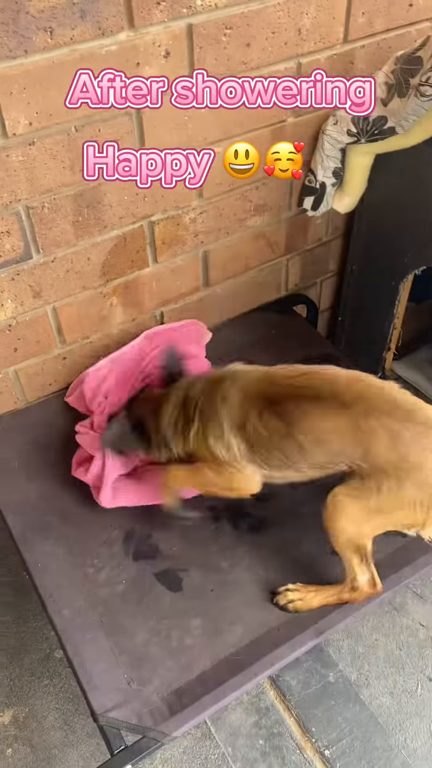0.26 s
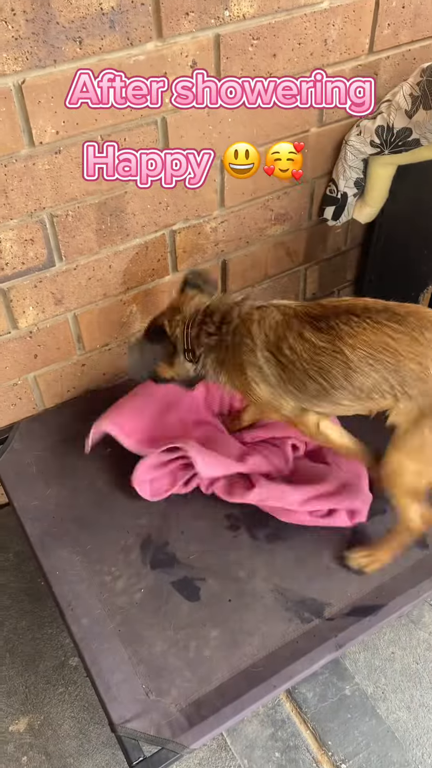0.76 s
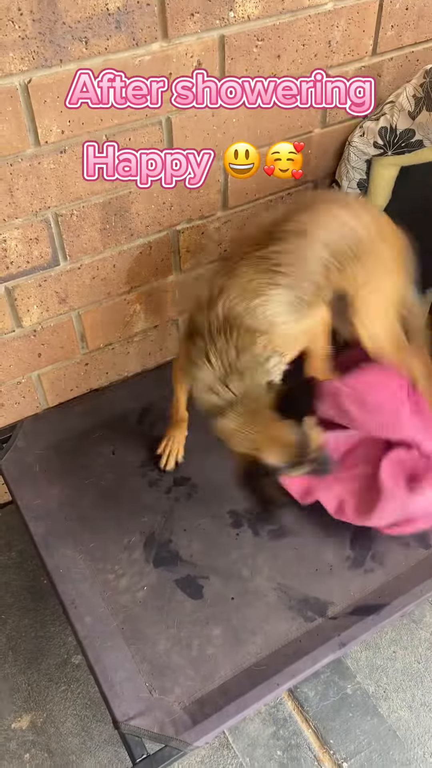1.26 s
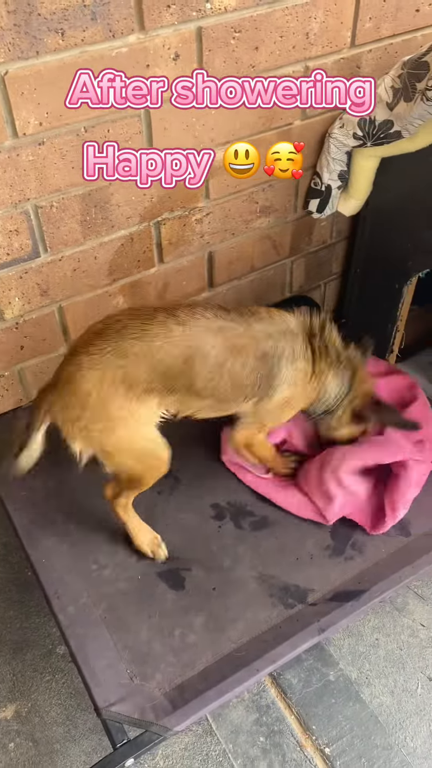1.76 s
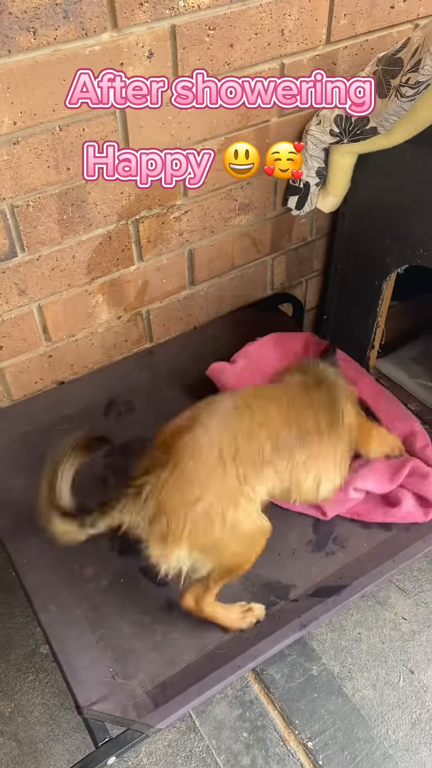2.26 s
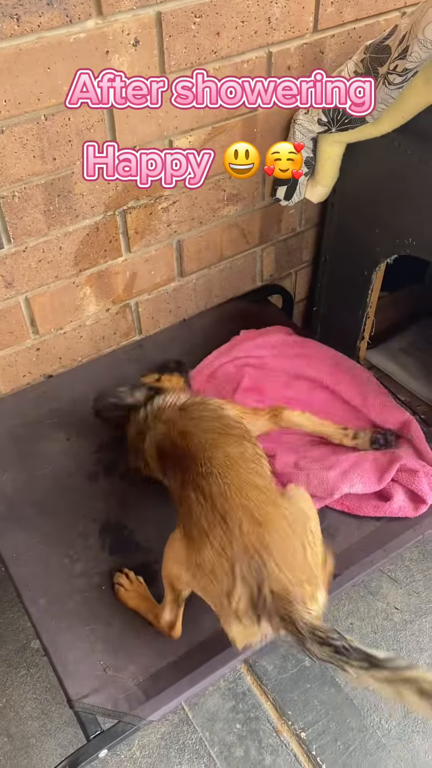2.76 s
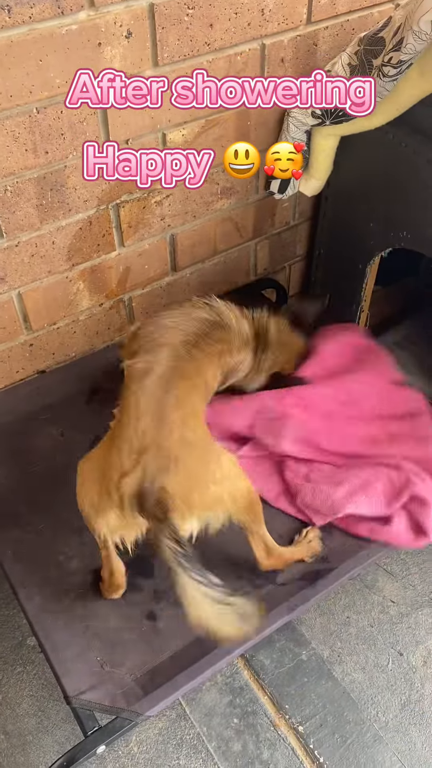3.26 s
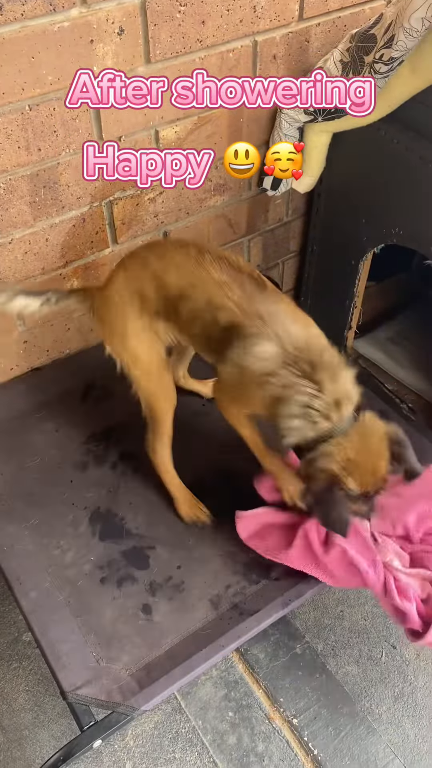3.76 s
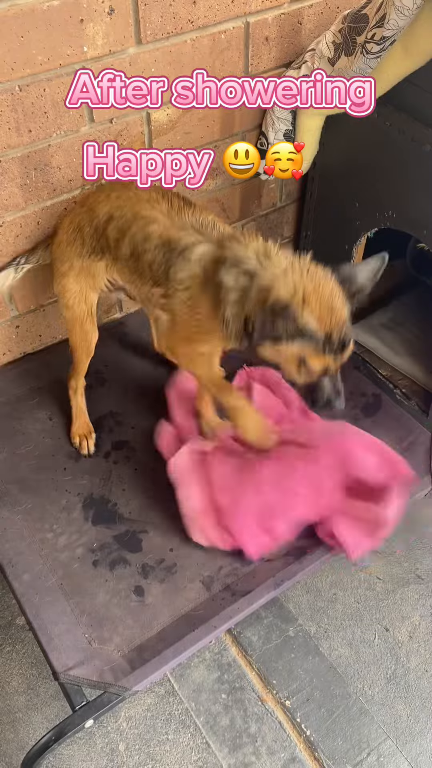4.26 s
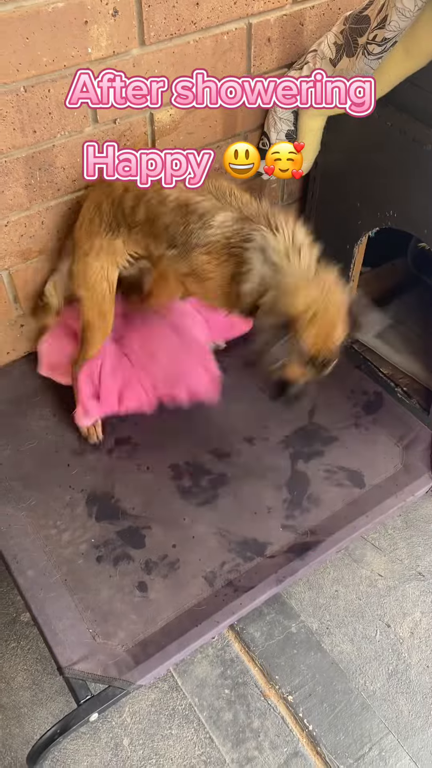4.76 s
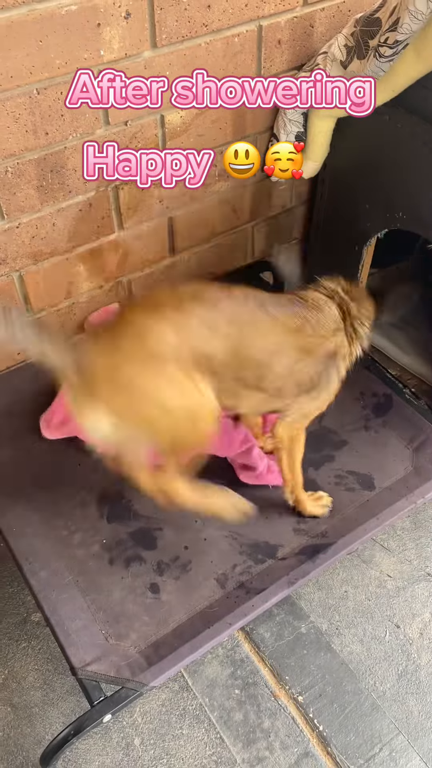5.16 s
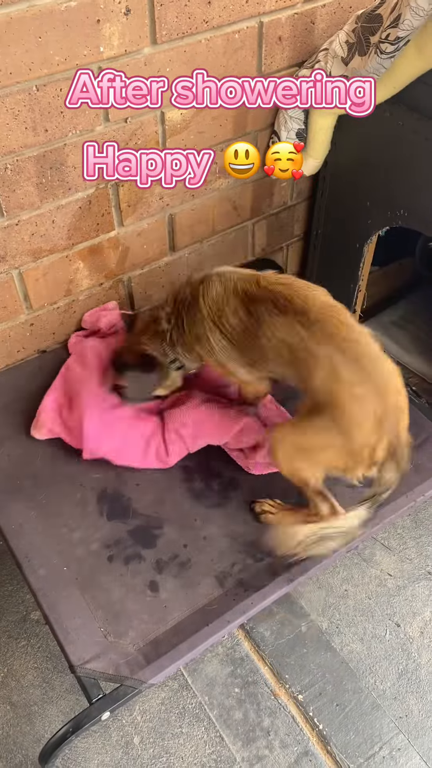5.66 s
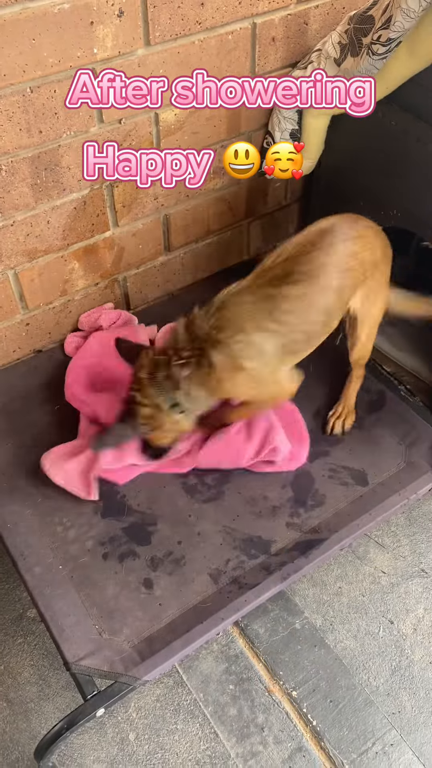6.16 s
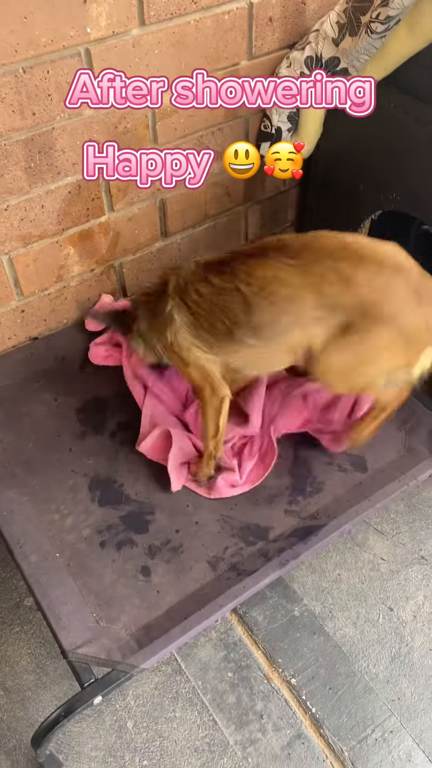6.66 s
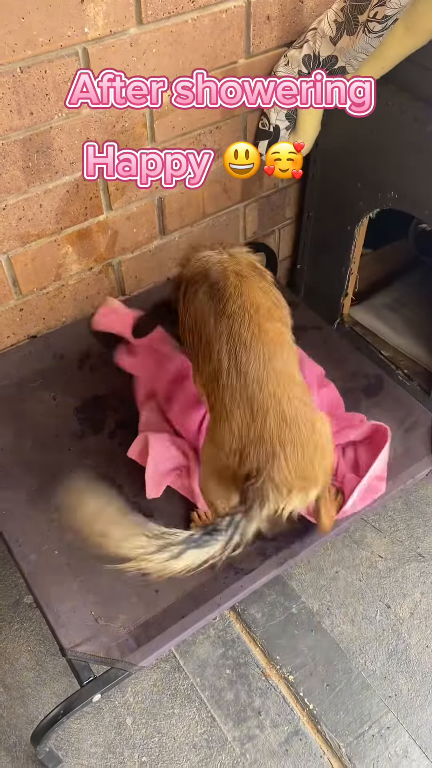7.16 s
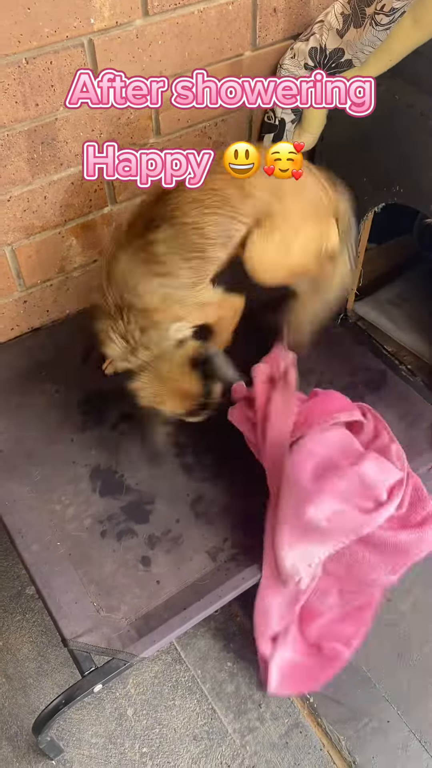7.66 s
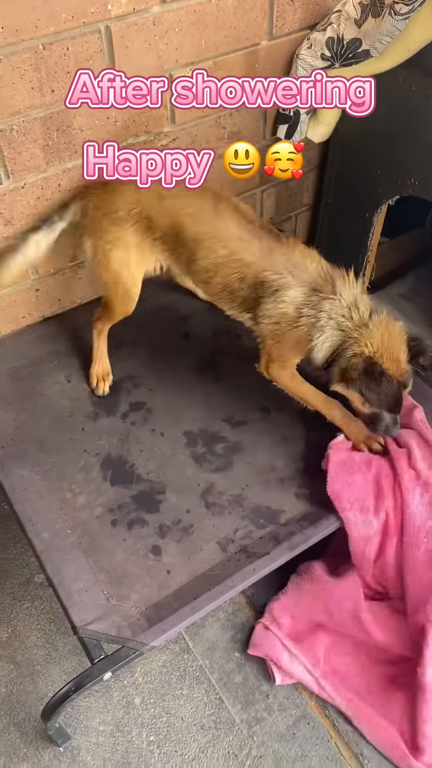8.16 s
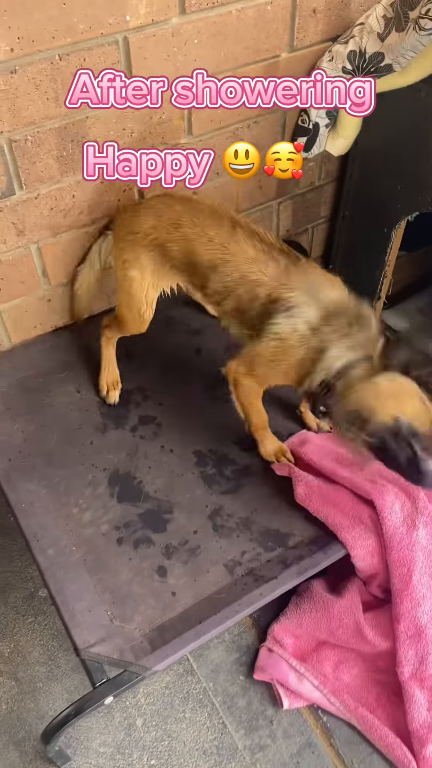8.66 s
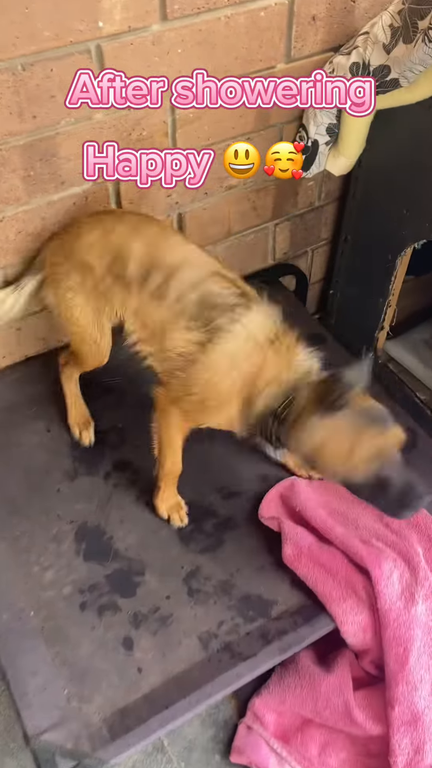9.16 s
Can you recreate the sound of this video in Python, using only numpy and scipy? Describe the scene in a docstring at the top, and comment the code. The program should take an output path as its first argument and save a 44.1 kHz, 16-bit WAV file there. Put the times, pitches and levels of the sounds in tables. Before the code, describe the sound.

Close, lively dog movement on stretched fabric: low springy footfalls in uneven clusters, slapping pads, occasional sinking body thuds and scratchy claws. Cloth and fur brush in short swishes throughout. The thumping is strongest around one and a half, five, and six and a half to eight seconds, then thins into light hollow knocks and bright clicks. Outdoors beside brick, slight reflections, narrow stereo.

```python
"""On a raised mesh bed beside a brick wall, a wet dog scrabbles about after a brief harsh opening squeak.
Paws and body thump the mesh like a slack drum: ringing tones, noise bursts and low sinking thuds.
Claws scratch, scrape and zip over the weave as tiny bursts and gliding tones; wet pads squeal.
Fur and towel rub as a wash of tiny clicks. Hard ticks, a ringing frame and hollow knocks join in.
Echoes of the walled corner follow, and two microphone openings make the stereo sound."""
import sys
import numpy as np
from scipy import signal
from scipy.fft import rfft, irfft
from scipy.io import wavfile
from scipy.ndimage import uniform_filter1d

SR = 44100
rng = np.random.default_rng(int(sys.argv[2]) if len(sys.argv) > 2 else 0)


def digitize_waveform(pressure):
    """Quantize a signal to 16-bit integers and store it at the path in sys.argv[1].

    Rows of a 2-D input are taken as channels; values are limited to [-1, 1].
    """
    field = np.atleast_2d(pressure).T
    bounded = np.clip(field, -1, 1)
    quanta = np.round(bounded * 32767).astype(np.int16)
    wavfile.write(sys.argv[1], SR, quanta)


N = 415422  # length [samples]
BEAT = np.arange(0, N / SR, .002)  # times at which the dog's movements are drawn [s]
FIRM_DB = -25  # force of an ordinary footfall [dB]

# paws landing on the bed: (time [s], bounce level [dB], centre of the favoured bounce modes [Hz],
# slap level [dB], centre of the favoured slap modes [Hz])
PAW_LANDINGS = [(0.068, -25.5, 244, -26.5, 470), (0.405, -28, 222, -24.5, 420), (0.725, -53, 220, -32, 520),
                (0.764, -43, 219, -28, 422), (0.878, -31.5, 194, -25.5, 437), (0.921, -23, 226, -19.5, 432),
                (0.962, -39, 200, -29.5, 460), (1.068, -28, 227, -25, 525), (1.107, -17, 197.5, -16.5, 365),
                (1.176, -24, 233, -28, 396), (1.323, -25.5, 214, -22, 490), (1.36, -41, 180, -26, 390),
                (1.415, -14.5, 230, -16, 375), (1.445, -21, 230, -34, 350), (1.512, -30, 206, -33, 420),
                (1.59, -27.5, 176, -32.5, 350.4), (1.723, -29, 197, -29, 420), (1.82, -32, 179.6, -33, 620),
                (1.925, -36, 192, -23, 660), (2.091, -24.5, 255, -22.5, 474), (2.148, -33, 192, -23, 524),
                (2.269, -40, 175.7, -31, 587), (2.387, -44, 200.8, -33.5, 540),
                (2.681, -30.5, 204, -34, 540), (2.768, -27, 220, -34.5, 475), (3.025, -30.5, 220, -30, 444),
                (3.06, -29, 245.6, -23, 494), (3.113, -45, 200, -28, 695), (3.15, -26, 270, -22, 506),
                (3.22, -27.5, 200, -17.5, 394), (3.501, -27.5, 182, -58, 495),
                (3.639, -24, 210, -26.5, 414.7), (3.756, -43, 225, -23, 490),
                (3.783, -27, 188, -23.5, 443.3), (3.815, -26.5, 193, -20, 550),
                (3.855, -35, 181.1, -23.5, 440), (4.06, -22, 211, -20.5, 534), (4.092, -24, 210, -19, 450),
                (4.3, -24.5, 227, -22.5, 456), (4.388, -29, 190, -26.5, 430), (4.622, -29, 217, -29.5, 443),
                (4.711, -30, 256, -25, 487), (4.736, -32, 220, -25, 495), (4.843, -25, 213, -21.5, 505),
                (4.864, -28, 240, -29, 430), (4.897, -25.5, 180, -19, 477), (4.972, -36, 200, -37, 470),
                (5.159, -21, 172, -27, 495.4), (5.181, -15, 203.5, -21.5, 410),
                (5.536, -36, 230, -32.5, 480), (5.573, -24, 209, -23.5, 360),
                (5.629, -26.5, 206, -21.5, 477), (6.028, -26, 196, -25.5, 457),
                (6.066, -28.5, 250, -20.5, 433), (6.136, -32, 262.2, -32.5, 393),
                (6.374, -32, 175.3, -35, 524), (6.438, -20, 260, -15, 440), (6.735, -16.5, 246.8, -14, 467),
                (6.768, -23.5, 263, -15.5, 362), (6.944, -25.5, 235, -23, 493), (7.113, -32, 245, -21, 460),
                (7.175, -28.5, 228, -37, 440), (7.387, -26.5, 235, -29, 420),
                (7.437, -14, 219, -16.5, 467.9), (7.473, -22, 209, -20, 510), (7.583, -33, 174, -30.5, 367),
                (7.742, -13, 207, -16, 367), (7.824, -40, 200, -31.5, 530), (7.876, -28, 180, -26.5, 383),
                (7.947, -24.5, 195, -20.5, 426.3), (8.067, -19.5, 189, -18, 478),
                (8.307, -29, 202, -23.5, 456), (8.509, -27, 190, -28, 362.9),
                (8.614, -47, 216.7, -23.5, 413), (8.91, -60, 206, -33, 485),
                (8.989, -34, 189.4, -24.5, 428), (9.02, -28, 202.7, -23, 480),
                (9.302, -28, 211, -30.5, 495)]


def amp(db):
    """Turns decibels into a gain."""
    return 10 ** (np.asarray(db) / 20)


def evened(x):
    """Scales a sound to an average strength (rms) of 1."""
    return x / np.sqrt(np.mean(x ** 2) + 1e-20)


def crested(x, size):
    """Scales a sound so that its loudest stretch of size samples has rms 1."""
    return x / np.sqrt(uniform_filter1d(x ** 2, size).max() + 1e-20)


def read(points, hz):
    """Reads a table of values over pitch, on a logarithmic pitch axis."""
    f, value = np.transpose(points)
    return np.interp(np.log(hz + 1), np.log(f + 1), value)


def curves(rows, t):
    """Reads every column of a table of curves at the times t."""
    s, *columns = np.transpose(rows)
    return [np.interp(t, s, c) for c in columns]


def add(mix, s, sound):
    """Mixes a sound in, starting at s seconds."""
    part = mix[max(round(s * SR), 0):][:len(sound)]
    part += sound[:len(part)]


def coloured(x, points, tilt_db=0):
    """Gives x a spectrum that fades beyond its end points; tilt_db per octave acts from 1 to 6 kHz."""
    hz = np.fft.rfftfreq(len(x), 1 / SR)
    octaves = np.log2(np.clip(hz, 1000, 6000) / 1000)
    low_end = 1 + (points[0][0] / (hz + 1)) ** 4
    high_end = 1 + (hz / points[-1][0] / 1.3) ** 8
    gain = amp(read(points, hz) + tilt_db * octaves) / np.sqrt(low_end * high_end)
    return evened(irfft(rfft(x) * gain, len(x)))


def wander(n, hz):
    """Smooth random motion of rms 1, mostly slower than hz."""
    f = np.fft.rfftfreq(n, 1 / SR)
    return evened(irfft(rfft(rng.standard_normal(n)) * np.exp(-(f / hz) ** 2), n))


def grains(n, per_s, spread_db):
    """Fibres catching and letting go: tiny clicks of very uneven size."""
    sizes = amp(spread_db * np.minimum(rng.exponential(1, n), 4.5))
    return evened(rng.standard_normal(n) * sizes * (rng.random(n) < per_s / SR))


def patchy(x, depth_db):
    """Folds and touching points favour some pitches for a moment, then others."""
    z = signal.stft(x, nperseg=512, noverlap=384)[2]
    field = uniform_filter1d(rng.standard_normal(z.shape), size=3, axis=0)  # across pitch
    field = uniform_filter1d(field, size=11, axis=1)  # along time
    gain = amp(depth_db * np.minimum(evened(field), 1))
    return evened(signal.istft(z * gain, nperseg=512, noverlap=384)[1][:len(x)])


def ring(modes, t, weights, rise, disorder, pitch=1):
    """One blow: place and load shift each mode, and the pitch sinks as the paw's pressure eases."""
    press_share, press_s = 0.10047, 0.022  # extra pitch at the blow [share], time in which it eases [s]
    hz, db, t60 = np.transpose(modes)[:, :, None]
    size, detune, phase = rng.standard_normal((3, len(modes), 1))
    clock = pitch * (t + press_share * press_s * (1 - np.exp(-t / press_s)))
    mode_hz = hz * (0.968 + 0.015 * detune)
    waves = np.sin(2 * np.pi * (mode_hz * clock + disorder * phase))
    levels = amp(db + 1.4 * size - 60 * t / t60)
    return (weights * levels * waves).sum(0) * (1 - np.exp(-(t / rise) ** 2))


def favoured(modes, centre_hz, octaves):
    """The spot and firmness of a blow favour the modes near one pitch."""
    return np.exp(-.5 * (np.log2(np.array(modes)[:, :1] / centre_hz) / octaves) ** 2)


def strokes(rows, rise, fall):
    """Power of moves (start, length, dB) that swell, hold and ease off; rise and fall are shares."""
    return sum((amp(db) * np.interp((BEAT - start) / length, [0, rise, 1 - fall, 1], [0, 1, 1, 0])) ** 2
               for start, length, db in rows)


def footfalls(firm_db, growth, lead, decay):
    """Power stirred up by the paws: it builds before each landing and dies away after it."""
    power = 0
    for s, low_db, _, high_db, _ in PAW_LANDINGS:
        force_db = 20 * np.log10(np.hypot(amp(low_db), amp(high_db))) - FIRM_DB
        shape = np.exp(-np.maximum((s - BEAT) / lead, (BEAT - s) / decay))
        power = power + (amp(firm_db + growth * force_db) * shape) ** 2
    return power


def activity(power, idle_db, fidget_db):
    """Gain of a layer: the dog's moves on top of its constant, uneven fidgeting."""
    fidget = uniform_filter1d(rng.standard_normal(len(BEAT)), size=30)
    fidget = evened(uniform_filter1d(fidget, size=15))
    gain = np.sqrt(power + amp(idle_db + fidget_db * fidget) ** 2)
    return np.interp(np.arange(N) / SR, BEAT, gain)


def squeak(rasp_db=-6):
    """A brief harsh squeak: harmonics of one shaky pitch plus rasping noise, stopping dead."""
    # path of the squeak: (time [s], pitch [Hz], relative level [dB])
    squeak_path = [(0, 857, -16.5), (.012, 813, -23), (.024, 807, -22), (.037, 820.8, -20.5)]
    # strength of its harmonics: (frequency [Hz], relative level [dB])
    squeak_tone = [(810, -0.5), (1620, -7.5), (2430, -6), (3240, -11), (4050, -10.5), (4860, -6),
                   (5700, -2), (6500, -5.5), (8100, -18), (9700, -23), (11300, -15), (13000, -42)]
    out, t = np.zeros(N), np.arange(0, squeak_path[-1][0], 1 / SR)
    hz, db = curves(squeak_path, t)
    turns = np.cumsum(hz * (1 + 0.0087 * wander(len(t), 390))) / SR
    tone = sum(amp(read(squeak_tone, k * hz)) * np.sin(2 * np.pi * (k * turns + rng.random()))
               for k in range(1, 16))
    rasp = amp(rasp_db) * coloured(rng.standard_normal(len(t)), squeak_tone)
    add(out, 0, amp(db) * evened(evened(tone) + rasp) * signal.windows.tukey(len(t), .04))
    return out


def bed(sag_db=1.0, drone_db=-1, scuffle_db=-2):
    """Shifting weight rocks the frame; countless small tugs keep the mesh murmuring."""
    # the dog throws its weight about: (start [s], length [s], relative sway of the frame [dB],
    # relative tugging at the mesh [dB])
    lurches = [(0.087, .13, -35.5, -35.5), (0.311, 0.1, -41.5, -38), (0.45, 0.24, -47, -43),
               (0.872, 0.1004, -34, -49.5), (1.23, 0.48, -39.5, -35.5), (1.797, 0.14, -36.5, -38.5),
               (2.12, 0.28, -39, -50), (2.746, 0.066, -34, -34), (3.067, 0.16, -52, -53),
               (3.346, 0.18, -39, -38), (3.516, 0.26, -37, -47), (4.327, 0.16, -37, -37.5),
               (5.155, 0.093, -33, -40), (5.545, 0.12, -33, -32), (6.148, 0.096, -53, -40),
               (6.741, 0.44, -56, -39.5), (7.153, 0.1299, -41, -34), (7.395, 0.15, -28, -26.5),
               (7.734, 0.28, -38, -34.5), (8.047, 0.18, -40, -48), (8.4, 0.2, -56, -41.5),
               (8.24, 0.18, -48, -30.5), (8.6, 0.1577, -45, -46.5), (8.987, 0.13, -37, -52),
               (9.235, 0.26, -40, -35)]
    # colour of the rocking frame: (frequency [Hz], relative level [dB per Hz])
    sag_colour = [(18, -43), (32, -23), (45, -6), (58, -1), (73, 0.5), (84, 1), (100, -11.5), (135, -11.5),
                  (220, -54)]
    # colour of the low mesh murmur: (frequency [Hz], relative level [dB per Hz])
    drone_colour = [(90, -26), (140, -39), (157, -7), (169, 1), (184, -5.5), (225, -8), (265, -8.5),
                    (300, -34), (420, -28)]
    # colour of the small tugs: (frequency [Hz], relative level [dB per Hz])
    scuffle_colour = [(240, -57), (305, -1.5), (340, 7), (420, -5), (520, 4), (620, -6), (780, -11),
                      (950, -49), (1500, -36)]
    sway = strokes([(s, length, db) for s, length, db, _ in lurches], rise=0.23, fall=0.27)
    tugs = strokes([(s, length, db) for s, length, _, db in lurches], rise=0.23, fall=0.27)
    step_sway = footfalls(firm_db=-50.5, growth=0.55, lead=0.07, decay=0.41)
    step_drone = footfalls(firm_db=-47, growth=.5, lead=0.12, decay=0.15)
    step_scuffle = footfalls(firm_db=-48, growth=.5, lead=0.25, decay=0.02)
    sag = activity(sway + step_sway, idle_db=-48.5, fidget_db=2.5)
    drone = activity(tugs + step_drone, idle_db=-48, fidget_db=5.0)
    scuffle = activity(tugs + step_scuffle, idle_db=-49, fidget_db=3.0)
    rocking = coloured(rng.standard_normal(N), sag_colour)
    rocking /= np.sqrt(uniform_filter1d(rocking ** 2, size=4000) + 0.086)  # the sway follows the weight closely
    murmur = coloured(rng.standard_normal(N), drone_colour)
    small_tugs = patchy(coloured(grains(N, 2500, 0.56), scuffle_colour), depth_db=8.0)
    return (amp(sag_db) * sag * rocking
            + amp(drone_db) * drone * murmur
            + amp(scuffle_db) * scuffle * small_tugs)


def rubbing(fizz_db=2, paw_fizz_db=-13, idle_fizz_db=-75):
    """Fur and towel drag over the weave: a dense wash of fibres with a slightly uneven grip."""
    # wipes of fur and towel: (start [s], length [s], level [dB], fizz relative to it before fizz_db [dB])
    wipes = [(0.0, 0.17, -37, -8.5), (0.255, 0.33, -49.5, -9.5), (0.69, 0.13, -51, -9),
             (0.504, 0.225, -36.5, -12), (0.814, 0.22, -36.5, -10), (1.02, 0.15, -40.5, -9),
             (1.171, 0.12464, -47.5, -14), (1.361, 0.11, -37.5, -10), (1.529, 0.07397, -42, -12),
             (1.721, 0.052, -41, -8), (1.858, 0.1, -44.5, -11), (2.044, 0.055, -44, -11),
             (2.254, 0.11, -37.5, -13.5), (2.339, 0.17, -42, -10), (2.447, 0.48, -53.5, -9),
             (2.832, 0.22, -60, 1.5), (3.046, 0.18398, -38.5, -10), (3.176, 0.24, -44.5, -11.5),
             (3.29, 0.49, -51.5, -11), (3.668, 0.25, -44, -14.5), (3.895, 0.25, -41, -9.5),
             (4.035, 0.079, -29.5, -22), (4.167, 0.21, -36, -13), (4.43, 0.2, -49, -10.5),
             (4.54, 0.28, -36, -10), (4.825, 0.11, -43, -28), (4.93, .18, -54, -19.5),
             (5.352, 0.075, -45.5, -11), (5.767, 0.17, -48, -18), (5.922, 0.0508, -50, -6.5),
             (6.109, 0.17, -42, -11), (6.19, 0.13, -48.5, -11), (6.373, 0.041, -45, -11.5),
             (6.665, 0.051, -49, -12), (6.705, 0.068, -43, -13), (6.867, 0.09353, -50, -11),
             (7.063, 0.27, -35.5, -10.5), (7.403, 0.44, -48, -9), (7.73, 0.45, -50, -9.5),
             (8.243, 0.15, -43, -10), (8.36, 0.09, -52, -9), (8.442, 0.078, -49.5, -9),
             (8.65, 0.33, -56.5, -6), (8.888, 0.066, -44.5, -9), (8.984, 0.084, -43, -17),
             (9.01, 0.4412, -49.5, -7), (9.27, 0.16, -40.5, -19)]
    # colour of the rubbing fibres: (frequency [Hz], relative level [dB per Hz])
    cloth_colour = [(350, 13.5), (700, 9), (1000, 1), (1350, 3.5), (2100, -0.5), (3500, -2), (5600, -7.5),
                    (7500, -42), (11000, -23)]
    # colour of the bright fizz: (frequency [Hz], relative level [dB per Hz])
    fizz_colour = [(3500, -15), (6000, 3), (7500, -5.5), (10500, -2), (13000, -7), (16000, -10)]
    paws = footfalls(firm_db=-58.5, growth=0.03, lead=0.42, decay=0.04)
    drag = strokes([row[:3] for row in wipes], rise=0.24, fall=0.38)
    brush = strokes([(s, length, db + share) for s, length, db, share in wipes], rise=0.24, fall=0.38)
    level = activity(drag + paws, idle_db=-64, fidget_db=1.5)
    fizz = activity(brush + amp(paw_fizz_db) ** 2 * paws, idle_fizz_db, fidget_db=1)
    fibres = level * patchy(coloured(grains(N, 25000, 2.1), cloth_colour), depth_db=4.5)
    tips = amp(fizz_db) * fizz * coloured(grains(N, 25000, 1.8), fizz_colour)
    grip_db = .9 * wander(N, 70)
    return amp(grip_db) * (fibres + tips)


def highpassed(x, hz):
    """Cuts steeply below hz."""
    return signal.sosfilt(signal.butter(N=4, Wn=hz, btype="high", fs=SR, output="sos"), x)


def steps(pat_db=-11, rebound_db=-7, shudder_db=-13.0, pat_growth=0.18):
    """A paw pats and slaps the mesh, the wave returns from the frame and scatters, the whole sheet bounces."""
    # the whole mesh, loaded by the dog: (frequency before the shifts of a blow [Hz],
    # relative level [dB], time to fall by 60 dB [s])
    bounce_modes = [(171.34, -6, 0.4), (186.4, -4, 0.12), (224.8, -1, 0.1), (248, -2, 0.12422),
                    (276, -15, 0.27)]
    # shorter waves around a paw: (frequency before the shifts of a blow [Hz],
    # relative level [dB], time to fall by 60 dB [s])
    slap_modes = [(334.3, -1.5, 0.21), (363.9, 3, 0.13), (403.8, 1, 0.084), (439.3, -11, 0.15),
                  (485.3, -5, 0.12), (524.7, -2.5, 0.092), (566.15, -2, 0.08), (660, -11.5, 0.09374),
                  (732.6, -3.5, 0.071), (810, -2, 0.011), (920, 8, 0.034)]
    # the pat of a wet pad: (frequency [Hz], relative level [dB per Hz])
    pat_colour = [(450, 24.5), (750, 10.5), (1000, -25), (1400, -3), (2200, -15.5), (4000, -15.5),
                  (8000, -26)]
    # dense short waves that a paw leaves on the mesh: (frequency [Hz], relative level [dB per Hz])
    shudder_colour = [(150, -23), (175, 5.5), (250, -2.5), (295, -7), (345, 0), (450, -2), (580, -6.5),
                      (780, -18), (1000, -61), (2000, -49)]
    slap_octaves, bounce_octaves = 0.35, 0.2  # range of modes woken; the slap's is for FIRM_DB [octaves]
    spread_per_db = -0.28  # change of the slap's range with force [dB per dB]
    pat_rise, pat_decay, shudder_rise, shudder_decay = 0.0008474, 0.0096, 0.0042, 0.041  # [s]
    out, t = np.zeros(N), np.arange(SR // 3) / SR
    for s, low_db, low_hz, high_db, high_hz in PAW_LANDINGS:
        force_db = high_db - FIRM_DB
        # a range in octaves that narrows with force wherever spread_per_db is negative
        spread = slap_octaves * amp(spread_per_db * force_db)
        pat = coloured(rng.standard_normal(len(t)), pat_colour)
        pat = crested(pat * np.exp(-t / pat_decay) * np.minimum(t / pat_rise, 1), size=200)
        tension = 1 + 0.036 * rng.uniform(-1.05, 1)  # the mesh is tighter or slacker as the dog shifts about
        slap_weights = favoured(slap_modes, high_hz, spread)
        slap = crested(ring(slap_modes, t, slap_weights, rise=.0008, disorder=.17, pitch=tension), size=380)
        bounce_weights = favoured(bounce_modes, low_hz, bounce_octaves)
        bounce = ring(bounce_modes, t, bounce_weights, rise=0.0071, disorder=0.23)
        bounce = crested(highpassed(bounce, hz=140), size=520)
        shudder = coloured(rng.standard_normal(len(t)), shudder_colour)
        shudder = crested(shudder * np.exp(-t / shudder_decay) * np.minimum(t / shudder_rise, 1), size=520)
        pat_gain = amp(pat_db + pat_growth * force_db)
        add(out, s, amp(high_db) * (slap + pat_gain * pat + amp(shudder_db) * shudder))
        add(out, s + rng.uniform(0.00791, 0.016), amp(high_db + rebound_db) * slap)  # the returning wave
        add(out, s, amp(low_db) * bounce)
    return out


def scrapes(slips_per_s=230, slip_s=0.00092, octaves=0.17, skirt_db=-13):
    """A claw jumps from thread to thread; every slip is a tiny burst around one pitch."""
    # gritty scrapes across the weave: (start [s], nominal length [s], level [dB], centre pitch [Hz])
    scrape_times = [(0.09, 0.018, -37, 9500), (1.922, 0.014, -33.5, 2500), (1.924, 0.0087, -25.5, 810),
                    (2.279, 0.038, -39, 2064), (2.285, 0.029, -41, 3220), (2.408, 0.056, -38.5, 1730),
                    (2.424, 0.036, -42, 3250), (2.757, 0.017, -41, 1250), (3.062, 0.072, -35, 680),
                    (3.234, 0.017, -39.5, 1550), (3.256, 0.022, -39, 1600), (3.381, 0.0227, -43.5, 1560),
                    (4.055, 0.01293, -28.5, 3070), (4.08, 0.014, -36, 2710), (4.849, 0.045, -43, 2080),
                    (5.033, 0.021, -39.5, 730), (5.193, 0.055, -48, 2180), (6.438, 0.031, -34.5, 730),
                    (6.732, 0.029, -30, 696), (7.42, 0.045, -36.5, 673), (8.036, 0.016, -41, 1670),
                    (8.318, 0.039, -40, 1560), (8.988, 0.045, -36.5, 706), (9.348, 0.018, -40.5, 1380)]
    out, t = np.zeros(N), np.arange(8192) / SR
    hz = np.fft.rfftfreq(len(t), 1 / SR) + 1
    for s, length, db, centre_hz in scrape_times:
        turns = np.cumsum(slips_per_s * np.exp(.5 * wander(len(t), 300))) / SR
        slips = np.exp(-(turns % 1) / (slips_per_s * slip_s)) * amp(3 * wander(len(t), 200))
        away = np.log2(hz / centre_hz)  # distance from the centre pitch [octaves]
        colour = np.exp(-.5 * (away / octaves) ** 2) + amp(skirt_db) * np.exp(-.5 * away ** 2)
        stroke = np.interp(t / length, [0, .15, .75, 1.2], [0, 1, 1, 0])
        bursts = slips * stroke * rng.standard_normal(len(t))
        add(out, s, amp(db) * crested(irfft(rfft(bursts) * colour), size=600))
    return out


def ticks(tail_db=-18, tail=0.017):
    """Hard contacts of claws on frame and paving: a crack and a brighter spit, each with a short tail."""
    # hard ticks: (time [s], crack level [dB], spit level [dB], decay [s])
    tick_times = [(0.1008, -30.5, -37, 0.004), (1.7683, -38, -55, 0.0043), (1.968, -36.5, -55, 0.0022),
                  (2.0726, -36, -53, 0.002115), (4.9, -58, -36, 0.0027), (5.3323, -50, -42, 0.00493),
                  (5.7388, -30, -37.5, 0.0041), (6.464, -33.5, -49, 0.0048), (8.659, -26, -43, 0.0043),
                  (8.8986, -32, -44, 0.0026), (9.1074, -30, -43, 0.0019), (9.125, -33.5, -44, 0.0027),
                  (9.3098, -36, -40, 0.0015), (9.325, -23.5, -25.5, 0.0028), (9.3736, -32.5, -32, 0.00186)]
    # colour of the crack: (frequency [Hz], relative level [dB per Hz])
    crack_colour = [(900, -8), (2200, -7), (3800, -2.5), (5300, 6), (6500, 6), (8500, -2.5), (12000, -17),
                    (16000, -12)]
    # colour of the bright spit: (frequency [Hz], relative level [dB per Hz])
    spit_colour = [(3500, -26), (6000, -7), (7500, 0), (10500, 4), (13500, -6), (15500, 3), (16500, 1)]
    out, t = np.zeros(N), np.arange(4096) / SR
    for s, db, bright_db, decay in tick_times:
        fall = np.exp(-t / decay) + amp(tail_db) * np.exp(-t / tail)
        for colour, level_db in (crack_colour, db), (spit_colour, bright_db):
            burst = coloured(rng.standard_normal(len(t)), colour) * fall
            add(out, s, amp(level_db) * crested(burst, size=130))
    return out


def scratches(release=0.008, brightening=0.69, fade=0.025):
    """A claw catches with a snap, scrapes on for the stroke and lets go."""
    # short claw scratches: (time [s], level [dB], nominal length [s],
    # brightness before brightening scales it [dB per octave])
    scratch_times = [(0.162, -37.5, 0.039, -7), (0.723, -42, 0.011, -6), (0.763, -39.5, 0.00685, -20),
                     (0.91, -32.5, 0.024, -6), (1.07, -34.5, 0.022, -6), (1.327, -42.5, 0.00981, -7.5),
                     (1.414, -30.5, 0.012, -8.5), (1.544, -38.5, 0.017, -12), (1.822, -42, 0.019, -7.5),
                     (1.916, -37, 0.008, -3), (1.925, -29.5, 0.01, -6), (2.087, -42.5, 0.008, -12),
                     (2.145, -35, 0.064, -6), (2.268, -38, 0.01, -9.5), (2.192, -41, 0.01758, -7.5),
                     (2.409, -38, 0.041, -6), (2.703, -45, 0.00923, -11), (2.757, -38.5, 0.016, -6),
                     (3.059, -38.5, 0.013, -0.5), (3.15, -37, 0.01, -12), (3.218, -35.5, 0.019, -6),
                     (3.252, -37.5, 0.022, -7), (3.333, -40, 0.026, -4), (3.404, -39.5, 0.032, -6.5),
                     (3.623, -43, 0.0092, 1), (3.671, -46, 0.008, 1), (3.736, -41.5, 0.025, -2),
                     (3.819, -36, 0.02, -6.5), (4.06, -23.5, 0.00692, -23), (4.084, -27.5, 0.0051, -10.5),
                     (4.376, -44, 0.01005, -8), (4.843, -30.5, 0.01, -8), (4.901, -37, 0.00641, -9),
                     (5.032, -40.5, 0.012, -8.5), (5.159, -37, 0.0067, -4), (5.187, -33, 0.011, -10.5),
                     (5.535, -42, 0.01452, -11.5), (5.565, -37, 0.025, -5), (5.799, -38.5, 0.017, -5.5),
                     (5.851, -39.5, 0.008, -11), (6.026, -43.5, 0.025, -13), (6.06, -51.5, 0.008, -8),
                     (6.438, -46, 0.01, -6), (6.581, -47.5, 0.007, 2), (6.732, -32, 0.012, -12.5),
                     (6.766, -54, 0.013, -7), (6.942, -40, 0.031, -22), (7.384, -36, 0.0046, -6),
                     (7.42, -37, 0.0084, -2), (7.473, -41.5, 0.006, -8), (7.564, -44, 0.015, -1),
                     (7.738, -37, 0.023, -4), (7.793, -43.5, 0.006, -2), (7.869, -39, 0.02532, -6),
                     (7.946, -35.5, 0.016, -19), (8.032, -41.5, 0.038, -8), (8.211, -45.5, 0.008, -7),
                     (8.305, -33, 0.013, -21), (8.615, -48, 0.012, -8), (8.777, -40.5, 0.00496, -12.5),
                     (8.986, -41, 0.0086, -8), (9.002, -37, 0.0084, -8), (9.148, -41.5, 0.016, -5),
                     (9.207, -33, 0.0028, -3), (9.282, -45, 0.005, -4), (9.308, -35, 0.005, -8),
                     (9.399, -38.5, 0.01, -9)]
    # colour of a claw on the weave: (frequency [Hz], relative level [dB per Hz])
    claw_colour = [(350, -3), (700, -4.5), (1400, 2), (2500, 3), (4000, -0.5), (6000, 0.5), (8500, -1.5),
                   (12000, -5), (16000, -13.5)]
    out, t = np.zeros(N), np.arange(4096) / SR
    for s, db, length, bright_db in scratch_times:
        letting_go = np.maximum(t - 0.86 * length, 0) / release
        stroke = np.clip(t / 0.00036, 0, 1) * np.exp(-t / fade - letting_go)
        snaps = coloured(grains(len(t), 7000, 3.3), claw_colour, tilt_db=brightening * bright_db)
        add(out, s, amp(db) * crested(patchy(snaps, depth_db=5.5) * stroke, size=350))
    return out


def zip_stroke(t, marks, rates, count=11, claw_db=-1, blur=0.93):
    """One claw plucks thread after thread and sings; thin streaks from the hairs follow its speed."""
    # hairs slide at different speeds: (factor on the thread rate, relative level [dB])
    hair_speeds = [(.42, -7), (.6, -3), (.82, -1), (1, -4), (1.2, -2), (1.7, -6)]
    fan, turns = 0, np.cumsum(np.exp(np.interp(t, marks, np.log(rates)))) / SR
    factors = np.geomspace(hair_speeds[0][0], hair_speeds[-1][0], count)
    for factor in factors * rng.uniform(.95, 1.05, count):
        touch = amp(np.interp(factor, *np.transpose(hair_speeds)) + 4 * wander(len(t), 30))
        phase = 2 * np.pi * (factor * turns + rng.random()) + blur * wander(len(t), 50)
        fan = fan + touch * np.sin(phase)
    claw = np.sin(2 * np.pi * turns + blur * wander(len(t), 90)) * (1 + .5 * wander(len(t), 60))
    grip = amp(2 * wander(len(t), 250))
    swell = np.sqrt(np.interp(t, marks, [0, 1, 0]))
    return evened((evened(fan) + amp(claw_db) * evened(claw)) * grip) * swell


def zips():
    """Paws slide over the weave, and the pitch follows the rate of passing threads."""
    # slides: (start [s], swell [s], fade [s], thread rate at start [Hz], at loudest [Hz], at end [Hz],
    # level [dB])
    slides = [(0.525, 0.038, 0.14, 1757, 1567, 948, -38.5), (0.816, 0.071, 0.017, 855, 2123, 2260, -36),
              (0.895, 0.023, 0.061, 2120, 2010, 1115, -35), (3.92, 0.083, 0.065, 830, 1930, 2295, -37),
              (4.2, 0.054, 0.07, 1892, 1690, 1394, -43.5), (4.59, 0.069, 0.037, 947, 1740, 2200, -39),
              (4.655, 0.032, 0.02, 2396, 3300, 3600, -39.5), (6.135, 0.029, 0.041, 1606, 1940, 2000, -44.5),
              (6.145, 0.015, 0.025, 3710, 4020, 4100, -46), (7.131, 0.041, 0.03, 2520, 2110, 2000, -49),
              (7.2, 0.029, 0.046, 2010, 2500, 1703, -34.5)]
    out, t = np.zeros(N), np.arange(SR // 4) / SR
    for start, swell, fade, *rates, db in slides:
        add(out, start, amp(db) * zip_stroke(t, [0, swell, swell + fade], rates))
    return out


def squeals(rasp_db=-8):
    """A wet pad sticks and slips fast enough to whistle; the pitch follows its speed."""
    # wet pads on the mesh, one curve for each squeal: (time [s], pitch [Hz], level [dB])
    squeal_paths = [
        [(1.058, 1445, -54), (1.071, 2450, -38), (1.08, 3290, -39), (1.09, 4160, -33), (1.1, 4520, -44),
         (1.125, 4210, -57), (1.138, 3660, -41), (1.146, 3500, -56)],
        [(4.808, 3900, -58), (4.818, 3970, -48), (4.84, 4050, -64)],
        [(7.095, 1920, -51), (7.118, 2076, -34), (7.14, 2310, -51), (7.165, 2850, -41)],
    ]
    out = np.zeros(N)
    for curve in squeal_paths:
        t = np.arange(curve[0][0], curve[-1][0], 1 / SR)
        hz, db = curves(curve, t)
        phase = 2 * np.pi * np.cumsum(hz * (1 + .012 * wander(len(t), 400))) / SR
        rasp = wander(len(t), 700) * np.cos(phase)
        grip = amp(4 * wander(len(t), 150))
        add(out, t[0], amp(db) * evened(grip * (np.sin(phase) + amp(rasp_db) * rasp)))
    return out


def flops(rise=0.0056, decay=0.013, sink=0.27, sink_s=0.026):
    """The dog's weight loads the mesh, so each low thud sinks in pitch."""
    # the body dropping onto the mesh: (time [s], level [dB], pitch at first [Hz])
    body_drops = [(1.385, -29, 147), (1.465, -31, 135), (1.835, -35, 150), (2.136, -30, 158),
                  (2.175, -27, 123), (4.846, -30, 139), (5.162, -23, 151), (7.184, -35, 133),
                  (7.464, -31, 107), (8.503, -39, 153)]
    out, t = np.zeros(N), np.arange(SR // 4) / SR
    for s, db, hz in body_drops:
        turns = np.cumsum(hz * (1 - sink * (1 - np.exp(-t / sink_s)))) / SR
        shape = (1 - np.exp(-(t / rise) ** 2)) * np.exp(-t / decay)
        add(out, s, amp(db) * crested(np.sin(2 * np.pi * turns) * shape, size=520))
    return out


def grazes(catches_per_s=900):
    """A claw chatters along the steel frame, which rings on briefly."""
    # claws grazing the frame: (start [s], length of contact [s], level [dB])
    graze_times = [(1.926, 0.022, -46.5), (2.428, 0.032, -44)]
    # what the frame rings with: (frequency [Hz], relative level [dB], time to fall by 60 dB [s])
    frame_modes = [(2460, -7.5, 0.13), (3360, -6, 0.1927), (3460, 1, 0.14), (3600, -1, 0.0982)]
    out, t = np.zeros(N), np.arange(SR // 4) / SR
    tube = sum(amp(db - 60 * t / t60) * np.sin(2 * np.pi * hz * t) for hz, db, t60 in frame_modes)
    for s, length, db in graze_times:
        chatter = grains(len(t), catches_per_s, 1) * (t < length)
        add(out, s, amp(db) * crested(signal.fftconvolve(chatter, tube)[:len(t)], size=400))
    return out


def knocks(grit_db=-6, grit_rise=0.0017, grit_decay=0.012):
    """Light, scuffing blows on something hollow, each on a slightly different spot."""
    # hollow knocks as the dog noses about at the edge of the bed: (time [s], level [dB], pitch factor)
    knock_times = [(8.814, -41, 1.1), (9.064, -25, 1.0), (9.11, -23.5, 1.01), (9.182, -27.5, 0.92),
                   (9.225, -32.5, .98), (9.27, -35, 1.15)]
    # the hollow ring: (frequency before the shifts of a blow [Hz], relative level [dB],
    # time to fall by 60 dB [s])
    knock_modes = [(436, -4, 0.054), (580.01, 5.5, 0.05), (710, -11, 0.035), (858.96, -8.5, 0.039),
                   (1300, -22, 0.027), (1750, -31, 0.01832), (2600, -24, .02)]
    # the scuff in each knock: (frequency [Hz], relative level [dB per Hz])
    grit_colour = [(400, 8), (620, 7.5), (850, 0), (1050, -25), (1400, -26), (2500, -27), (5000, -21.5)]
    out, t = np.zeros(N), np.arange(SR // 6) / SR
    for s, db, pitch in knock_times:
        tok = crested(ring(knock_modes, t, 1, rise=0.0037, disorder=0.22, pitch=pitch), size=380)
        grit = coloured(grains(len(t), 2500, 2.9), grit_colour)
        grit = crested(grit * np.minimum(t / grit_rise, 1) * np.exp(-t / grit_decay), size=380)
        add(out, s, amp(db) * (tok + amp(grit_db) * grit))
    return out


def yard(x):
    """Scattered echoes from wall, paving and roof; each band dies at its own speed."""
    # the walled corner: (frequency [Hz], time to fall by 60 dB [s])
    yard_decay = [(60, 0.47), (170, 0.61), (450, 0.2899), (1200, 0.55), (5000, 0.3), (14000, 0.53)]
    taps = rng.choice([-1., 1.], SR) * (rng.random(SR) < 2500 / SR)
    taps[:round(.007 * SR)] = 0  # no echo in the first 7 ms
    hz, t, z = signal.stft(taps, SR, nperseg=256)
    tail = signal.istft(z * amp(-60 * t / read(yard_decay, hz)[:, None]), SR, nperseg=256)[1]
    return signal.fftconvolve(x, tail / np.linalg.norm(tail))[:N]


def ports(direct, diffuse):
    """Two microphone openings share the direct sound, with a phase gap that grows in the treble."""
    # how far the left opening leads: (frequency [Hz], phase [radians])
    port_phase = [(0, 0), (70, -.01), (170, -.05), (400, -.16), (900, -.2), (1600, -.08), (2000, .1),
                  (2500, .7), (3000, .8), (3500, .55), (4500, .75), (5000, .2), (5500, .6), (6000, 1.55),
                  (6500, 2.45), (7000, 2.92), (7500, 3.2), (8200, 3.75), (9000, 5), (10000, 6.2),
                  (11000, 6.35), (12000, 7.8), (13000, 9.3), (14000, 9.5), (15300, 11.4)]
    # left level minus right level: (frequency [Hz], level [dB])
    port_balance = [(100, 0), (300, -.3), (600, -.6), (1100, -.3), (2000, -.5), (2500, -1.8), (3500, -.9),
                    (4500, -3), (5200, 0), (16000, 0)]
    # likeness of the two sides: (frequency [Hz], likeness [0 to 1])
    likeness = [(100, .9995), (250, .996), (500, .978), (1100, .9), (1900, .96), (2500, .78), (4000, .8),
                (5400, .82), (7200, .95), (9000, .72), (10500, .94), (12000, .65), (13500, .9),
                (15300, .75)]
    hz = np.fft.rfftfreq(N, 1 / SR)
    same = read(likeness, hz)
    shared = rfft(direct) * np.sqrt((1 + same) / 2)
    apart = rfft(diffuse) * np.sqrt((1 - same) / 2)
    lead = np.exp(1j * read(port_phase, hz) / 2)
    balance = amp(read(port_balance, hz) / 2)
    left = (shared + apart) * lead * balance
    right = (shared - apart) / lead / balance
    return irfft(np.array([left, right]), N)


def scene(thump_wet_db=-11, claw_wet_db=-11, squeak_shared_db=-1.0, squeak_apart_db=-8):
    """All the sounds of the dog and the bed in their corner."""
    mesh, cloth = bed(), rubbing()
    thumps = steps() + flops() + knocks()
    claws = scrapes() + ticks() + scratches() + zips() + squeals() + grazes()
    echoes = yard(amp(thump_wet_db) * thumps + amp(claw_wet_db) * claws)
    dog = thumps + claws + mesh + cloth
    direct = dog + echoes + amp(squeak_shared_db) * squeak()
    # rubbing comes from a wide patch and the squeak is diffuse, so both differ in part between the openings
    squeak_apart = amp(squeak_apart_db) * np.array([squeak(), squeak()])
    return ports(direct, yard(dog)) + squeak_apart


def record(dry):
    """The microphones' band limit: a steep cut above 15.9 kHz."""
    band_limit = signal.firwin(511, 15900, window=("kaiser", 9), fs=SR)
    return signal.oaconvolve(dry, band_limit[None], "same")


dry = scene()
out = record(dry)
digitize_waveform(out)
```